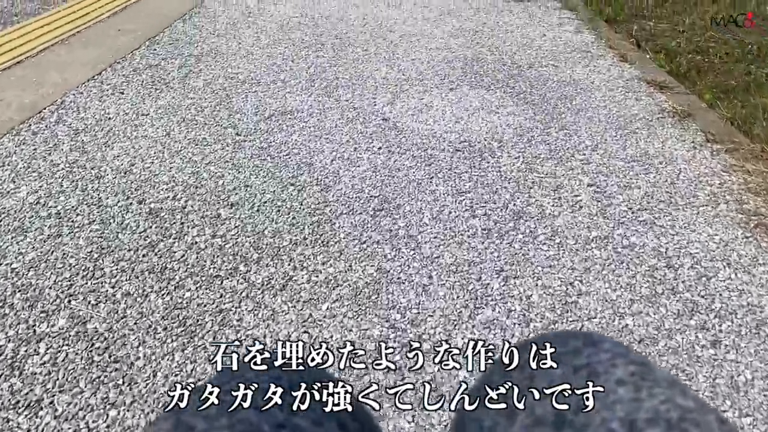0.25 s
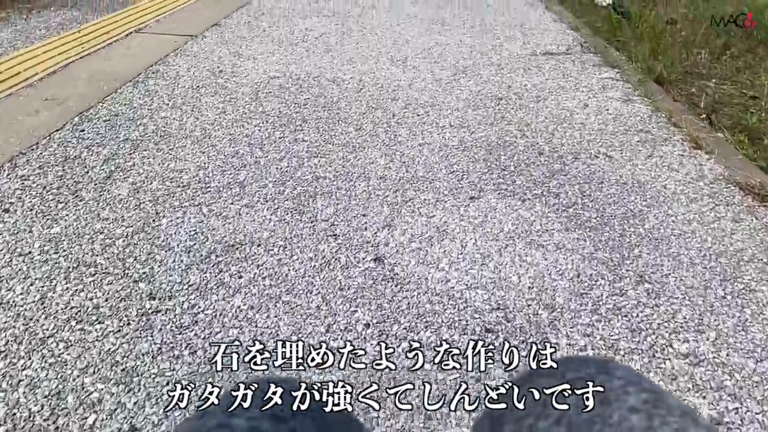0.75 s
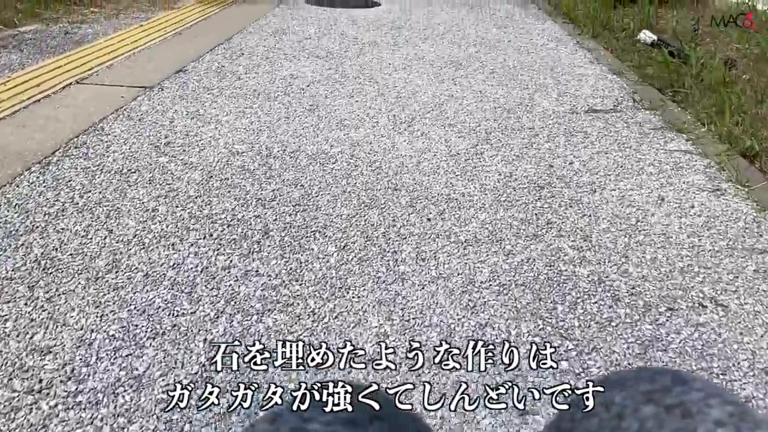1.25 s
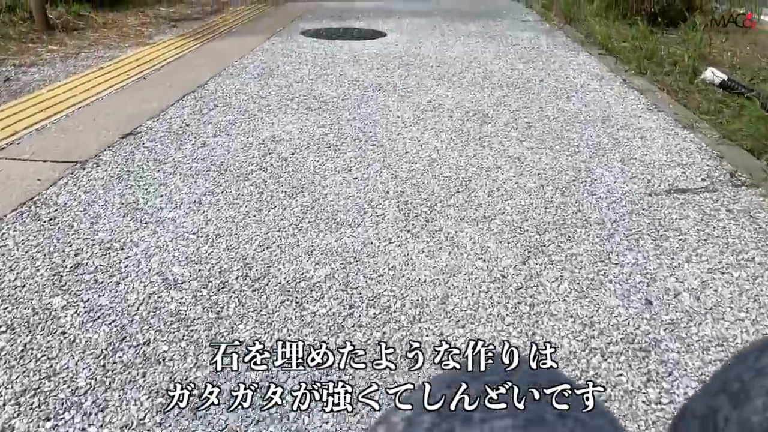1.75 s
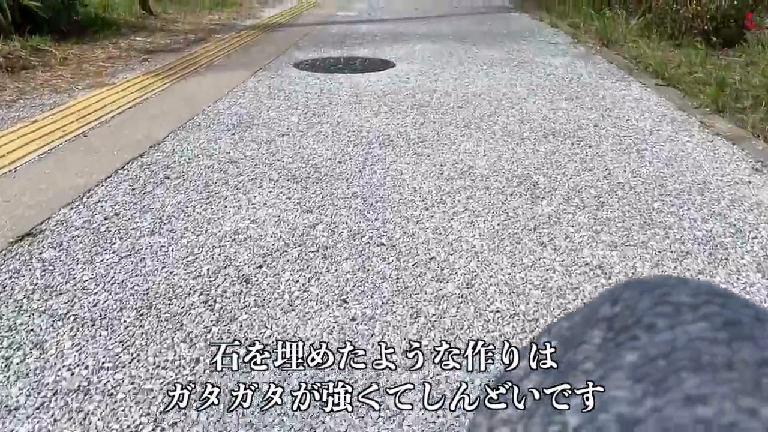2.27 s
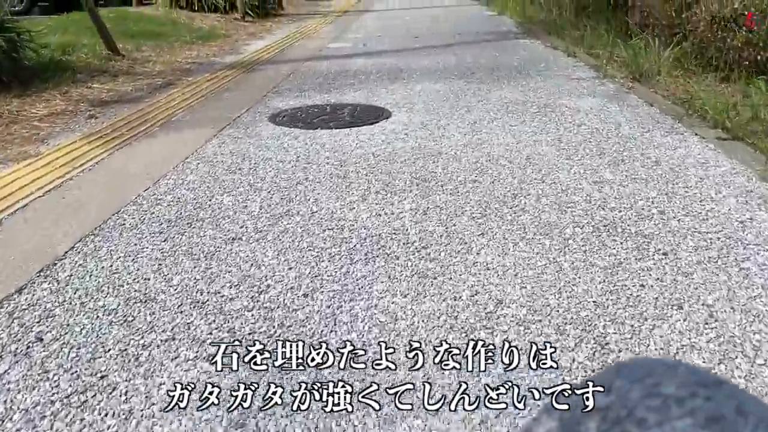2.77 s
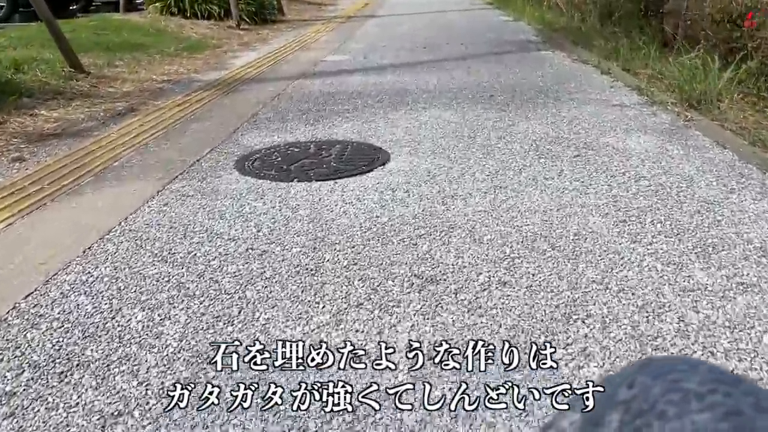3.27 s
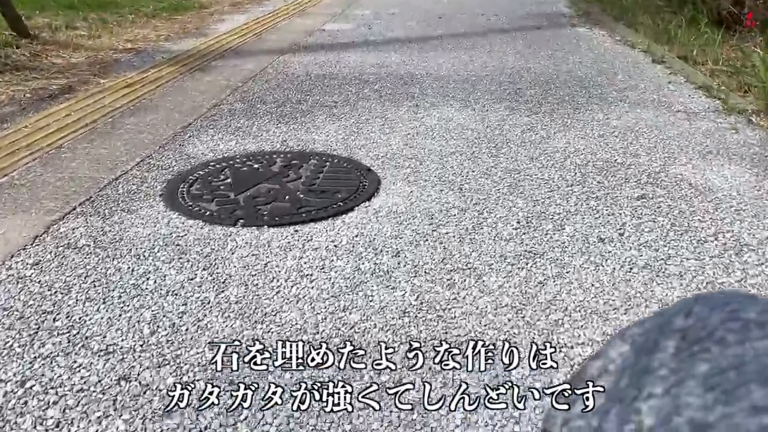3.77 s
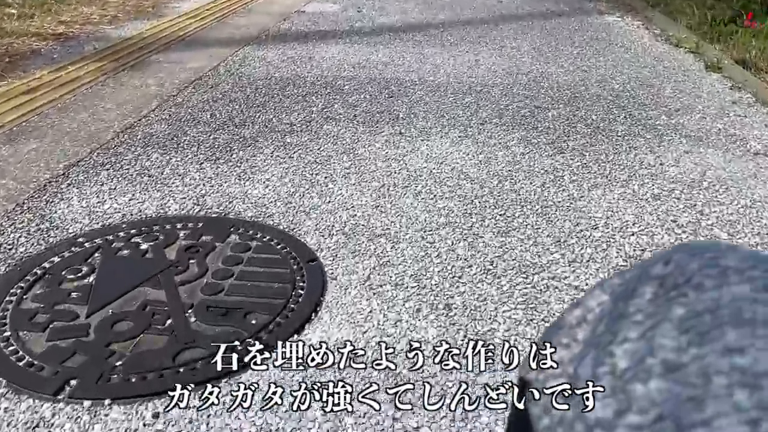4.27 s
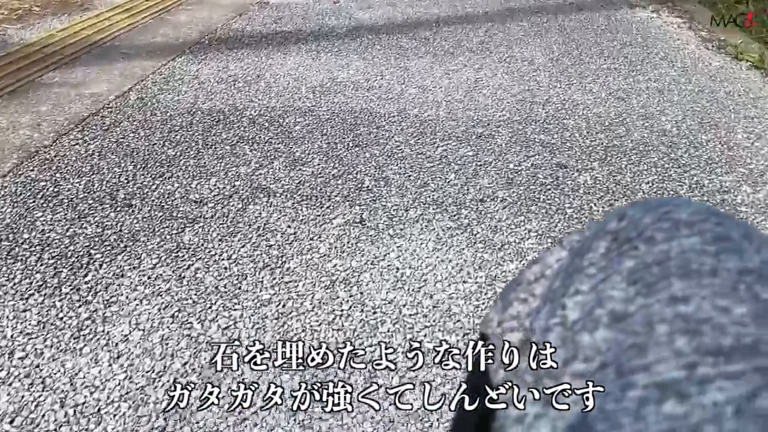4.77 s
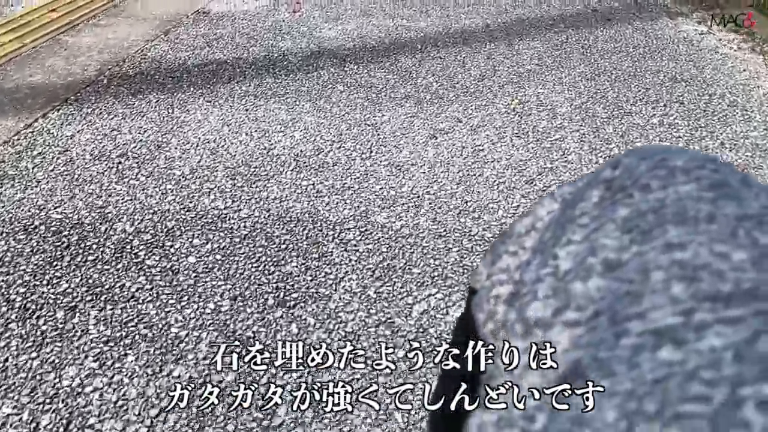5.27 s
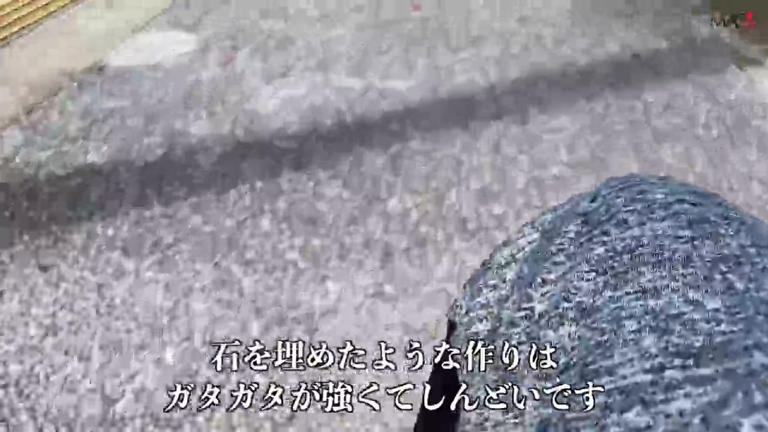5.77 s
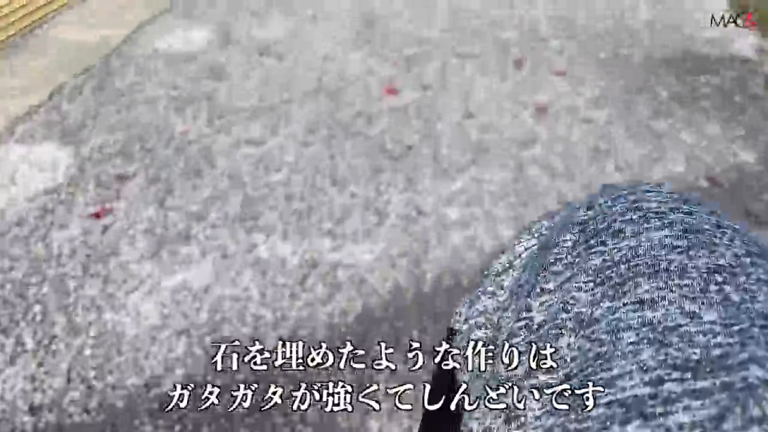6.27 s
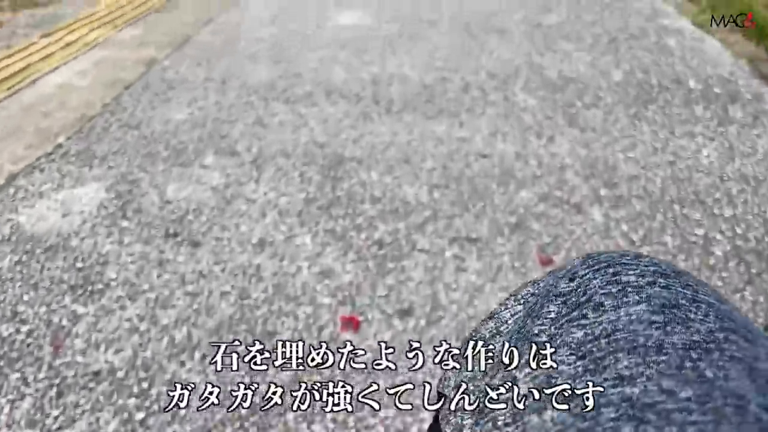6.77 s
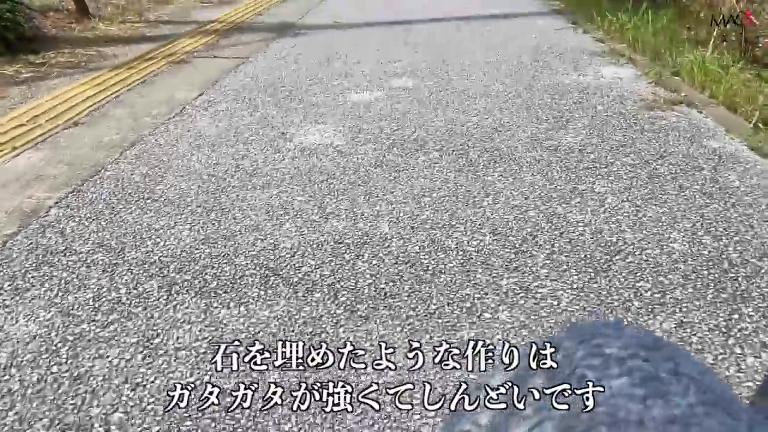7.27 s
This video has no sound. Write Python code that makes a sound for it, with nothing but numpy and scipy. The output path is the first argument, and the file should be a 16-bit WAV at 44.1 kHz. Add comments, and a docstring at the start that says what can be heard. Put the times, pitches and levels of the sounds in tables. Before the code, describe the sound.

A wheelchair rolls without stopping over rough paving studded with small stones, heard close from on board, outdoors, in stereo. A bassy, unsteady throb and dense rumble lie beneath gritty tyre roar and fine crunching. In the first second, several dull thuds drop quickly in pitch, with small chattering rattles and light metallic clacks. From about 1 to 3 seconds a loose fitting clacks irregularly and more brightly, while a thin hiss swells, turns airy near 2.7, and fades by about 4. Between 3.6 and 6 seconds small parts buzz and tick in short clusters, with a stronger clack around 4.9 and another near 5.4. The rolling gradually eases and its rasp softens. At about 6.45 a sharp bump brings a loud, hard burst of clacks, thuds and rattling. Afterwards quieter rumbling and a few clacks remain, with distant cars rising faintly, mostly on the right, near 7 seconds.

```python
"""Outdoors, on paving studded with small stones, a wheelchair rolls along, heard from on board.
Random impacts of stones drum on the tyres and excite resonances of the wheels, frame and small parts.
A loose metal fitting clacks as a set of damped modes, most of all over one sharp bump; small parts
chatter in clusters of tiny contacts, and thuds fall quickly in pitch. A thin high hiss of filtered
noise swells and fades, and distant cars, delayed noise, come and go, mostly on the right."""
import sys
import numpy as np
from scipy.fft import rfft, irfft, next_fast_len
from scipy.io import wavfile
from scipy.ndimage import map_coordinates

SR = 44100
rng = np.random.default_rng(int(sys.argv[2]) if len(sys.argv) > 2 else 0)


def output_pcm(signal):
    """Save a mono or channel-first signal as 16-bit PCM at the path in sys.argv[1].

    Samples are clipped to [-1, 1] before scaling.
    """
    pcm = np.clip(np.atleast_2d(signal).T, -1, 1) * 32767
    wavfile.write(sys.argv[1], SR, np.round(pcm).astype(np.int16))


N = 332073


def amp(db):
    """Decibel law: 20 dB is a factor of ten in amplitude."""
    return 10 ** (np.asarray(db) / 20)


def unit(x):
    """Normalisation: scale to a root-mean-square of 1."""
    return x / np.sqrt(np.mean(x ** 2) + 1e-20)


def along(points, hz, axis=1):
    """Interpolation on a log frequency axis: one column of a table that starts with Hz."""
    table = np.transpose(points)
    return np.interp(np.log(hz + 1), np.log(table[0]), table[axis])


def curves(rows):
    """Linear interpolation in time: one value per sample for each column after the seconds."""
    seconds, *columns = np.transpose(rows)
    return [np.interp(np.arange(N) / SR, seconds, column) for column in columns]


def wobble(rate):
    """Slow random modulation: a smooth curve through random knots, rate of them a second."""
    knots = rng.standard_normal(int(N * rate / SR) + 4)
    return map_coordinates(knots, [np.arange(N) * rate / SR])


def add(track, s, sound):
    """Superposition: mix a short sound into a track at s seconds."""
    part = track[..., max(round(s * SR), 0):][..., :sound.shape[-1]]
    part += sound[..., :part.shape[-1]]


def filtered(x, response):
    """Linear filtering: multiply the spectrum by a complex response of frequency."""
    padded = 2 * next_fast_len(N // 2 + SR // 8)
    hz = np.fft.rfftfreq(padded, 1 / SR)
    return irfft(rfft(x, padded) * response(hz), padded)[..., :N]


def causal(spectrum, hz):
    """Minimum phase by a folded cepstrum: no ringing before the event, and a power gain of 1."""
    cepstrum = irfft(np.log(unit(amp(along(spectrum, hz)))))
    half = len(cepstrum) // 2
    return np.exp(rfft(np.r_[cepstrum[0], 2 * cepstrum[1:half], np.zeros(half)]))


# Left-right likeness at the microphone pair. Each row: frequency in Hz, correlation from 0 to 1.
LIKENESS = [(60, 0.75), (150, 0.83), (280, 0.61), (450, 0.3), (700, 0.56), (1100, 0.048), (1600, 0.046),
            (2400, 0.3), (3300, 0.049), (4600, 0.15), (6000, 0.14), (7200, 0.99), (8300, 0.78), (9500, 1),
            (11000, 0.097), (13000, 1)]


def spread(pair, spectrum):
    """Interchannel coherence: colour two unrelated signals, then blend them as mid and side."""
    def mid_side_response(hz):
        angle = np.arccos(np.clip(along(LIKENESS, hz), -1, 1)) / 2
        return causal(spectrum, hz) * np.array([np.cos(angle), np.sin(angle)])

    mid, side = filtered(pair, mid_side_response)
    return np.array([mid + side, mid - side])


def stones(rate, scatter_db):
    """Shot noise: two tracks of random contacts, rate a second, of either sign and uneven size."""
    met = rng.random((2, N)) < rate / SR
    sign = rng.choice([-1, 1], (2, N))
    return unit(met * sign * amp(scatter_db * rng.standard_normal((2, N))))


def bursts(events, attack, tail_db, tail_t60):
    """Exponential decay: each (s, dB, t60 s) swells, dies and leaves a weak tail; powers add."""
    power, t = np.zeros(N), np.arange(SR // 8) / SR
    for s, db, t60 in events:
        decay = amp(-60 * t / t60) + amp(tail_db - 60 * t / tail_t60)
        add(power, s, (amp(db) * (1 - np.exp(-t / attack)) * decay) ** 2)
    return np.sqrt(power)


def resonant(modes, hz):
    """Second-order resonance: the summed band-pass responses of modes with alternating sign."""
    total = 0
    for k, (centre, width, db) in enumerate(modes):
        damping = 1j * hz * width
        total = total + (-1) ** k * amp(db) * damping / (centre ** 2 - hz ** 2 + damping)
    return total


def resonate(x, modes):
    """Forced vibration: the ring of resonances, at about the power of what shakes them."""
    def response(hz):
        raw = resonant(modes, hz)
        return raw / np.sqrt(np.mean(abs(raw) ** 2))

    return filtered(x, response)


def swell_db(t, span, rise, fall):
    """Ramps linear in dB: level below full, rising to a span, holding, falling; slopes in dB/s."""
    return -rise * np.maximum(span[0] - t, 0) - fall * np.maximum(t - span[1], 0)


BUMP_S, BUMP_WIDTH_S = 6.455, 0.045


def bump():
    """A Gaussian pulse: the jolt of the sharp bump, from 0 up to 1 and back."""
    return np.exp(-((np.arange(N) / SR - BUMP_S) / BUMP_WIDTH_S) ** 2)


# How hard the paving shakes the chair; only departures from the mean are used.
# Each row: time in seconds, shaking in dB.
SHAKING = [(0, -25.5), (0.45, -27.5), (1.15, -26.5), (1.75, -26.5), (2.15, -26), (2.9, -26), (3.4, -28),
           (3.75, -27), (4.6, -27.5), (5.1, -28), (5.9, -29), (6.6, -28.5), (7.53, -29.5)]


def shaken(level_db, growth, bump_db):
    """A power law: gain grows by growth dB per dB of shaking about its mean, and lifts at the bump."""
    shake_db, = curves(SHAKING)
    return amp(level_db + growth * (shake_db - shake_db.mean()) + bump_db * bump())


# Spectra of the rolling layers. Each row: frequency in Hz, relative density in dB per Hz.
BOOM_SPECTRUM = [(15, -33), (25, -11), (40, -3.5), (52, 4), (68, -0.5), (85, -2), (110, -13), (200, -59.5)]
RUMBLE_SPECTRUM = [(50, -26), (80, -2.5), (100, 1.5), (135, 1.5), (190, -1), (255, -2), (305, -3.5),
                   (350, -8.5), (390, -6.5), (450, -9), (600, -26), (1200, -68.5)]
ROAR_SPECTRUM = [(250, -32), (420, -4), (490, 0.5), (555, 2.5), (650, -3), (790, -5), (950, -11),
                 (1400, -42), (3000, -55.5)]
RASP_SPECTRUM = [(500, -25), (850, 0), (1020, 0.5), (1150, -2), (1300, -2), (1500, -5.5), (1700, -23.5),
                 (2100, -22), (4000, -46.5)]
# Rasp of the tread over stretches of coarser stone. Each row: time in seconds, relative level in dB.
COARSE_STRETCHES = [(0, -35.5), (0.8, -34.5), (1.55, -34.5), (2.7, -34), (3.7, -34), (4.15, -36.5),
                    (5.4, -37.5), (5.8, -40.5), (6.55, -38.5), (7.05, -44), (7.53, -53)]
RASP_LIFT_DB, RASP_BUMP_DB = -2.5, 8


def rolling():
    """Filtered shot noise: stones drum; the frame booms, the tyres rumble, the tread roars and rasps."""
    boom = unit(spread(stones(rate=400, scatter_db=2.0), BOOM_SPECTRUM))
    rumble = unit(spread(stones(rate=900, scatter_db=1.5), RUMBLE_SPECTRUM))
    roar = unit(spread(stones(rate=1300, scatter_db=0.2), ROAR_SPECTRUM))
    rasp = unit(spread(stones(rate=1500, scatter_db=0.5), RASP_SPECTRUM))
    coarse_db, = curves(COARSE_STRETCHES)
    mix = shaken(level_db=-30.5, growth=0.92, bump_db=1) * boom
    mix += shaken(level_db=-27, growth=1, bump_db=1) * rumble
    mix += shaken(level_db=-34, growth=0.78, bump_db=3.8) * roar
    return mix + amp(coarse_db + RASP_LIFT_DB + RASP_BUMP_DB * bump()) * rasp


# Resonances of wheel and frame. Each row: frequency in Hz, width in Hz, relative level in dB.
WHEEL_MODES = [(289.7, 38, 4), (400, 43, -2.5), (545, 61, 0.5), (778, 106, -3.5), (1288, 98, -11.5),
               (1827, 130, -16)]


def wheels():
    """Impulse excitation of modes: the prouder stones set wheel and frame ringing in uneven lumps."""
    left, right = stones(rate=90, scatter_db=3.0)
    knocks = np.array([left + right / 2, left - right / 2])
    return shaken(level_db=-35.7, growth=1, bump_db=6) * unit(resonate(knocks, WHEEL_MODES))


# The chair falls in and out of its throb. Each row: time in seconds, relative level in dB.
THROB_LEVELS = [(0, -26.5), (0.55, -27), (0.95, -34), (1.65, -23.5), (2.25, -31), (2.75, -20.5), (3.3, -30),
                (3.75, -42), (4.35, -25.5), (5.0, -26), (6.1, -30), (6.5, -34), (7.53, -33.5)]
THROB_DB = -4
SHUDDER_HZ, SHUDDER_WANDER = 64.13, 0.0375  # central pitch, and its share of unsteadiness


def shudder():
    """Frequency and amplitude modulation: the shaken chair throbs at one low, unsteady pitch."""
    throb_db, = curves(THROB_LEVELS)
    hz = SHUDDER_HZ * (1 + SHUDDER_WANDER * wobble(14))
    tone = np.sin(2 * np.pi * np.cumsum(hz) / SR)
    return amp(throb_db + THROB_DB) * unit(amp(0.99 * wobble(5.32)) * tone)


# Spectra of the crunch and of touching small parts.
# Each row: frequency in Hz, relative density in dB per Hz.
GRIT_SPECTRUM = [(1000, -12.5), (1500, 7.5), (1700, 11), (1840, 7), (2100, 6.5), (2700, 2), (3500, -0.5),
                 (4900, -7.5), (5500, -8), (5850, -5), (6400, -13), (7300, -6.5), (9000, -42), (13000, -26),
                 (16000, -41)]
TINKLE_SPECTRUM = [(500, -12), (1300, 1), (1800, 3), (2300, -2), (3100, 3), (4200, 0), (4900, 1),
                   (5500, -2), (5900, -3), (6400, -9), (8000, -6), (9000, -4), (10000, -7), (12000, -6),
                   (13300, -6.5), (16000, -20)]
# Small metal parts, set ringing by the shaking.
# Each row: frequency in Hz, width in Hz, relative level in dB.
PART_MODES = [(2880, 160, -8), (3220, 140, -1), (3596, 90, 0), (4085, 70, -3), (4560, 30, 0),
              (4720, 70, -4), (4900, 160, -6), (5555, 30, -2), (5745, 80, -1), (6835, 140, -7),
              (9240, 50, 4), (11015, 45, 1), (11490, 70, 4), (11950, 75, 1), (12350, 45, -2),
              (13280, 60, 1), (14940, 60, 2)]


def grit():
    """Clumped shot noise and resonance: the tread crunches finely and keeps metal parts jingling."""
    clumps = amp(1.6 * wobble(22) + 1.8 * wobble(130))
    crunch = unit(spread(clumps * stones(rate=2200, scatter_db=0.5), GRIT_SPECTRUM))
    touches = spread(clumps * stones(rate=400, scatter_db=2.5), TINKLE_SPECTRUM)
    jingle = unit(resonate(touches, PART_MODES))
    gain = shaken(level_db=-49.5, growth=2.1, bump_db=14)
    return gain * (amp(5.0) * crunch + amp(-9.0) * jingle)


# Spectra of the hiss and its airy top. Each row: frequency in Hz, relative density in dB per Hz.
HISS_SPECTRUM = [(3000, -16), (4500, -5), (5800, -2), (6800, 0), (8000, -2), (9500, -7), (12000, -22)]
AIR_SPECTRUM = [(6000, -22), (8500, -8), (10000, -1.5), (12000, 0), (14000, -1), (15200, -3), (16000, -12)]
HISS_SPAN_S, AIR_SPAN_S = (1.65, 2.75), (2.5, 2.8)  # from and to, at full strength
HISS_DB, AIR_DB = -52.5, -49  # at full strength, before the flicker


def hiss():
    """Filtered noise: a smooth hiss grows airier as it swells, over a faint flickering sizzle."""
    def noise(spectrum):
        return unit(spread(rng.standard_normal((2, N)), spectrum))

    t = np.arange(N) / SR
    body = amp(HISS_DB + swell_db(t, HISS_SPAN_S, rise=22, fall=19)) * noise(HISS_SPECTRUM)
    air = amp(AIR_DB + swell_db(t, AIR_SPAN_S, rise=20, fall=27)) * noise(AIR_SPECTRUM)
    sizzle_gain = shaken(level_db=-60, growth=0.83, bump_db=9.7) * amp(3 * wobble(45))
    return amp(0.8 * wobble(30)) * (body + air) + sizzle_gain * noise(AIR_SPECTRUM)


# Distant cars. Each row: time in seconds, level in dB, delay of left behind right in milliseconds.
TRAFFIC_PATH = [(0, -39, 0.37), (0.9, -40, .29), (1.7, -35, 0.28), (2.4, -40, 0.51), (2.8, -43, .1),
                (3.5, -40, 0.25), (4.1, -51, -.07), (5.3, -48.5, -.07), (6.4, -50, 0.27),
                (6.85, -36.5, 0.44), (7.12, -35.5, 0.18), (7.53, -37.5, .12)]
# Their tyre roar. Each row: frequency in Hz, relative density in dB per Hz.
ROAD_SPECTRUM = [(300, -31), (600, -10), (800, 0.5), (1000, 5), (1200, 3.5), (1400, -6.5), (2000, -28),
                 (4000, -51)]
AROUND_DB = -2.5  # the part that arrives from all around, against the direct part


def traffic():
    """Interaural-style delay: a hollow tyre roar reaches the two ports at different, moving times."""
    level_db, lag_ms = curves(TRAFFIC_PATH)
    noise = rng.standard_normal((3, N))
    direct, *around = unit(filtered(noise, lambda hz: amp(along(ROAD_SPECTRUM, hz))))
    half_lag = lag_ms * SR / 1000 / 2  # samples
    pair = np.array([map_coordinates(direct, [np.arange(N) - side * half_lag], mode="mirror")
                     for side in (1, -1)])
    return amp(level_db) * unit(pair + amp(AROUND_DB) * np.array(around))


RATTLE_PER_S, RATTLE_DB, RATTLE_SCATTER_DB = 7.1, -40, 4.5
RATTLE_SPAN_S, RATTLE_FADE = (3.7, 5.9), 78  # at full strength from and to; fade in dB per second
RATTLE_SIZZLE_DB, RATTLE_T60_S = -10, 0.025


def faint_rattle():
    """A jittered point process: weak bursts of chatter, in the columns of the stronger ones."""
    draws = rng.random((int(RATTLE_PER_S * N / SR), 2))
    times = (np.arange(len(draws)) + draws[:, 0]) / RATTLE_PER_S
    levels = RATTLE_DB + swell_db(times, RATTLE_SPAN_S, RATTLE_FADE, RATTLE_FADE)
    levels = levels + RATTLE_SCATTER_DB * (2 * draws[:, 1] - 1)
    return [(s, db, RATTLE_SIZZLE_DB, RATTLE_T60_S) for s, db in zip(times, levels)]


# Bursts of small parts chattering. Each row: start in seconds, relative level in dB,
# high sizzle against the body in dB, time to fall by 60 dB in seconds.
CHATTER_BURSTS = [(0.029, -31.5, -3, .03), (0.449, -38.5, -10, .03), (0.501, -30.5, -7, .03),
                  (0.527, -31, -6, 0.032), (0.911, -35, -14, 0.033), (0.932, -42, -10, .03),
                  (2.555, -30.5, -20, 0.039), (2.799, -27, -20, 0.033), (3.632, -33.5, -18, 0.037),
                  (3.689, -34, -14, .012), (3.702, -32, -9, 0.03), (3.735, -35.5, -20, .035),
                  (3.772, -38, -8, .01), (3.790, -39, -12, .012), (3.819, -29.5, -15, 0.047),
                  (3.872, -28, -11, 0.02), (3.910, -33, -18, 0.016), (4.116, -28, -1, 0.028),
                  (4.160, -31, -20, .015), (4.170, -30, -20, 0.027), (4.311, -36.5, -2, 0.044),
                  (4.331, -36, -4, .012), (4.342, -28.5, -5, 0.013), (4.409, -36, -8, 0.032),
                  (4.528, -35, -16, 0.014), (4.583, -36, 2, .012), (4.617, -28, -15, 0.022),
                  (4.673, -34, -14, .015), (4.854, -35, -19, .02), (4.913, -33, -15, .02),
                  (4.953, -30, -20, 0.035), (5.016, -37, 0, .015), (5.446, -37, -15, .015),
                  (5.494, -30, -16, .02), (5.653, -39, -16, 0.033), (5.695, -30.5, -16, .018),
                  (5.780, -35, -18, .015), (5.793, -31, -18, 0.021), (5.825, -28.5, -22, 0.015),
                  (5.899, -35, -6, 0.018), (6.381, -37, -6, .015), (6.402, -30, -10, .012),
                  (6.419, -31, -10, 0.055), (6.4375, -17, 3, 0.02), (6.456, -23, -20, 0.013),
                  (6.4615, -15, -9, 0.014), (6.472, -21, -13, 0.024), (6.692, -35, 5, 0.032)]
CONTACTS_PER_S = 1500  # tiny contacts within a burst
CHATTER_KNOCK_DB = -3.5  # how much the frame takes up


def chatter():
    """Gated shot noise: small parts tick, buzz and sizzle in clusters of contacts that ring the frame."""
    def cluster(events):
        envelope = bursts(events, attack=.0016, tail_db=-20, tail_t60=.06)
        return stones(rate=CONTACTS_PER_S, scatter_db=3) * envelope

    rows = list(CHATTER_BURSTS) + faint_rattle()
    body = cluster([(s, db, t60) for s, db, _, t60 in rows])
    sizzle = cluster([(s, db + sizzle_db, t60) for s, db, sizzle_db, t60 in rows])
    buzz = spread(body, TINKLE_SPECTRUM) + spread(sizzle, AIR_SPECTRUM) / 2
    parts = resonate(buzz, PART_MODES)
    frame = resonate(buzz, WHEEL_MODES[-2:])  # the two highest resonances
    return amp(2.5) * buzz + amp(-8.5) * parts + amp(CHATTER_KNOCK_DB) * frame


FAVOUR_WIDTH = 0.11  # width of the favoured region, in natural log of frequency


def ring(modes, t, favoured_hz, favour_db):
    """Modal synthesis: damped modes start together at new strengths, more near a favoured pitch."""
    hz, db, t60 = np.transpose(modes)[:, :, None]
    nearness = np.exp(-(np.log(hz / favoured_hz) / FAVOUR_WIDTH) ** 2)
    db = db + 1.8 * rng.standard_normal(hz.shape) + favour_db * nearness
    sign = (-1) ** np.arange(len(hz))[:, None]
    return np.sum(sign * amp(db - 60 * t / t60) * np.sin(2 * np.pi * hz * t), axis=0)


# Strikes of the loose fitting. Each row: first touch in seconds, relative level in dB,
# favoured pitch in Hz, relative knock in the frame in dB.
FITTING_STRIKES = [(0.0328, -30, 3190, -3), (0.132, -22, 3150, -2), (0.3589, -21.5, 3350, -2),
                   (0.5089, -23.5, 3240, 1), (0.5302, -22, 3560, -5), (0.9253, -17, 3150, 0),
                   (0.9465, -19, 3230, -5), (1.093, -27, 3240, -1), (1.2007, -23, 3250, -12),
                   (1.4458, -17.5, 3500, -3), (1.51, -25.5, 3630, -2), (1.61, -22.5, 3640, -8),
                   (1.634, -26, 3610, 7), (1.8794, -23.5, 3730, -10), (2.0642, -16, 4100, -1),
                   (2.094, -21, 4080, 2), (2.2092, -16, 4330, -0.5), (2.404, -18.5, 3700, 0),
                   (2.4217, -15, 4100, 0), (2.537, -16, 4070, 2), (2.818, -17, 4080, 3),
                   (2.9363, -18.5, 4150, 1.5), (3.031, -22, 3850, 2.5), (3.136, -27, 3770, 8.5),
                   (3.2081, -21, 3830, 4), (3.3009, -26, 3660, 10), (3.9095, -34, 3700, 4),
                   (3.985, -25.5, 4320, 2), (4.718, -35, 3230, -6), (4.9434, -16, 3700, -1.5),
                   (5.0637, -27, 3600, 2), (5.4243, -16, 4400, -3.5), (5.465, -21.5, 3580, 0),
                   (5.9346, -22, 3670, 2), (6.415, -22, 4380, 3), (6.442, -9, 4900, -3.5),
                   (6.4692, -12.5, 4360, -3.5), (6.497, -17.5, 4170, -1), (6.876, -22.5, 3820, -2),
                   (7.013, -26, 3740, 6), (7.366, -27.5, 3550, 5)]
# Modes of the fitting, and of the frame under it.
# Each row: frequency in Hz, typical relative level in dB, time to fall by 60 dB in seconds.
FITTING_MODES = [(2550, -11, .009), (2870, -7, .011), (3230, .5, .015), (3610, 0, .018), (4080, -2, .016),
                 (4290, -3, .014), (4650, 1.5, .012), (4950, 1, .012), (5400, -12, .01), (5760, -9, .016),
                 (7050, -13, .011), (8650, -7, .016), (9280, -5, .019), (10500, -16, .01),
                 (11500, -10, .016), (13200, -17, .014)]
FRAME_MODES = [(524, -7, 0.077), (827, 2.5, 0.028), (1280, -0.5, 0.037), (1650, -11, 0.041),
               (1830, -6.5, 0.037)]
# The crack of contact. Each row: frequency in Hz, relative density in dB per Hz.
CRACK_SPECTRUM = [(300, -28), (800, 3), (1300, 15), (2200, 8), (4500, 2), (5200, 3), (6100, -6), (7500, 7),
                  (9300, 12), (12000, -6.5), (14500, -5), (16000, -32)]
CLACK_DB, KNOCK_DB, CRACK_DB, FAVOUR_DB = -13, 7, 0.5, 7
CONTACT_DELAY_S = 0.00065  # from first touch to full contact
KNOCK_LAG_S, CLACK_ATTACK_S = .0005, .0003
REBOUND_S, REBOUND_DB = .0016, -13  # mean delay of the second touch, and its level against the first


def fitting():
    """Impact of damped bodies: a brief crack, a dead metallic ring with a rebound, a frame knock."""
    track, t = np.zeros(N), np.arange(SR // 12) / SR
    rise = 1 - np.exp(-t / CLACK_ATTACK_S)
    chances = rng.random(len(FITTING_STRIKES))
    for (s, db, hz, knock_db), chance in zip(FITTING_STRIKES, chances):
        contact = s + CONTACT_DELAY_S
        gain = amp(db + CLACK_DB) * rise
        add(track, contact, gain * ring(FITTING_MODES, t, hz, FAVOUR_DB))
        rebound = amp(REBOUND_DB) * ring(FITTING_MODES, t, hz, FAVOUR_DB)
        add(track, contact + REBOUND_S * (.5 + chance), gain * rebound)
        knock = amp(knock_db + KNOCK_DB) * ring(FRAME_MODES, t, hz, favour_db=0)
        add(track, contact + KNOCK_LAG_S, gain * knock)
    contacts = [(s + CONTACT_DELAY_S, db, .007) for s, db, *_ in FITTING_STRIKES]
    puffs = bursts(contacts, attack=.0005, tail_db=-24, tail_t60=.05) * rng.standard_normal(N)
    return track + amp(CRACK_DB) * filtered(puffs, lambda hz: causal(CRACK_SPECTRUM, hz))


STONES_PER_S, STONE_DB, STONE_SCATTER_DB = 20, -27, 2
STONE_START_HZ, STONE_LANDING_HZ, STONE_RING_DB = 904, 278.4, -4  # pitches of a middling stone


def lesser_thuds():
    """A uniform random process: weak thuds of ordinary stones, in the columns of the big ones."""
    count = int(STONES_PER_S * N / SR)
    times, draws = rng.random(count) * N / SR, rng.standard_normal((count, 2))
    seconds, shake_db = np.transpose(SHAKING)
    shake = np.interp(times, seconds, shake_db - shake_db.mean())
    levels = STONE_DB + shake + STONE_SCATTER_DB * draws[:, 0]
    scales = np.exp(.2 * draws[:, 1])  # each stone shifts both pitches together
    return [(s, db, STONE_START_HZ * scale, STONE_LANDING_HZ * scale, STONE_RING_DB)
            for s, db, scale in zip(times, levels, scales)]


# A wheel drops off a proud stone. Each row: start in seconds, level in dB, starting pitch in Hz,
# landing pitch in Hz, after-ring in dB against the thud.
BIG_THUDS = [(0.2592, -17, 1500, 287, 0), (0.2692, -15.5, 1390, 283, -15), (0.317, -19, 900, 310, -7),
             (0.3873, -15, 1620, 272, -15), (0.4452, -17.5, 1090, 332, -7), (0.458, -13, 915, 210, -9),
             (0.536, -15, 450, 160, -12), (0.552, -15, 850, 228, -10), (0.8102, -14.5, 1800, 240, -6),
             (0.822, -13.5, 655, 236, -16), (2.8033, -21, 1000, 330, -11), (2.998, -16, 900, 290, -9),
             (4.9289, -20, 890, 220, -12), (5.653, -23, 1380, 295, -14), (6.4279, -18, 1090, 297, 6),
             (6.4433, -18, 1420, 512, 2), (6.4543, -16, 980, 520, -1), (6.466, -20.5, 980, 534, -4)]
THUD_SWELL_S, THUD_FALL_S = .0024, .00135  # time to the peak, and time constant of the pitch
THUD_RING_T60_S = 0.081  # the wheel rings on


def thuds():
    """Bending-wave dispersion: short waves arrive first, so a thud falls to the pitch that rings on."""
    track, t = np.zeros(N), np.arange(SR // 12) / SR
    swell = t / THUD_SWELL_S * np.exp(1 - t / THUD_SWELL_S)
    tail = (1 - np.exp(-t / THUD_SWELL_S)) ** 2 * amp(-60 * t / THUD_RING_T60_S)
    for s, db, start_hz, landing_hz, ring_db in list(BIG_THUDS) + lesser_thuds():
        hz = landing_hz + (start_hz - landing_hz) * np.exp(-t / THUD_FALL_S)
        envelope = amp(db) * np.maximum(swell, amp(ring_db) * tail)
        add(track, s, envelope * np.sin(2 * np.pi * np.cumsum(hz) / SR))
    return track


# The two microphone ports. Each row: frequency in Hz, phase lead of left over right in radians,
# level of left over right in dB.
PORT_DIFFERENCES = [(50, -.15, 1), (150, -.18, .4), (260, -.48, -.9), (520, -.85, -.6), (700, -1.5, -1.6),
                    (950, -1.9, -2.4), (1264, 1.5, 0), (1805, 1.6, 1), (2400, 1.3, .8), (3200, 1.1, 1),
                    (3620, 1.1, 2.3), (4100, .4, 2.7), (4700, 1.1, 6.5), (5400, .7, 3), (5900, -.2, 4),
                    (7000, -1.7, 3.3), (7700, -2.7, 2), (8600, -3.2, 0), (10800, -4.5, 0),
                    (13000, -6.28, 0)]


def ports(pair):
    """Interchannel phase and level: each port hears each pitch with half of the difference."""
    half = np.array([[.5], [-.5]])

    def response(hz):
        phase = half * along(PORT_DIFFERENCES, hz)
        level_db = half * along(PORT_DIFFERENCES, hz, axis=2)
        return np.exp(1j * phase) * amp(level_db)

    return filtered(pair, response)


def scene():
    """Superposition: the chair is heard through the ports, and the traffic is added to it."""
    chair = rolling() + wheels() + shudder() + grit() + hiss()
    chair = chair + fitting() + thuds() + chatter()
    return ports(chair) + traffic()


TOP_HZ = 15900


def record(dry):
    """Band limiting: an ideal low-pass keeps nothing from the top frequency upwards."""
    return filtered(dry, lambda hz: hz < TOP_HZ)


dry = scene()
out = record(dry)
output_pcm(out)
```